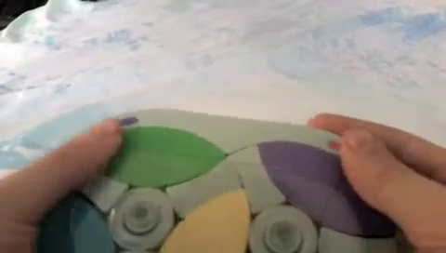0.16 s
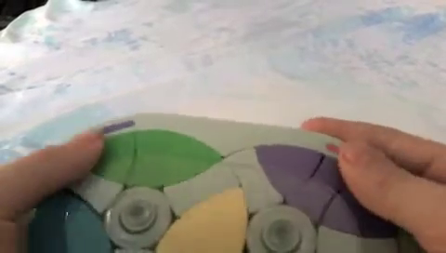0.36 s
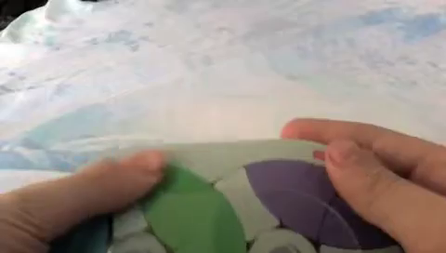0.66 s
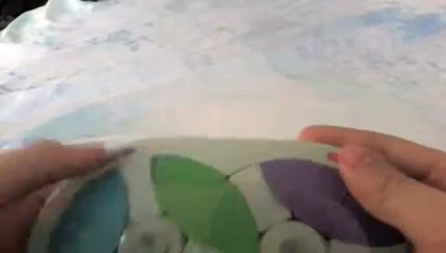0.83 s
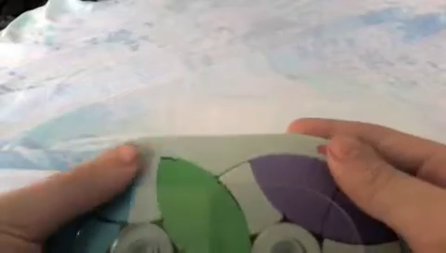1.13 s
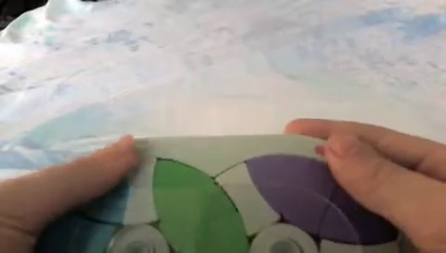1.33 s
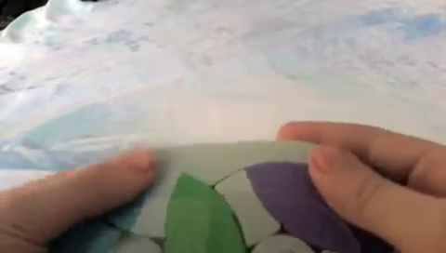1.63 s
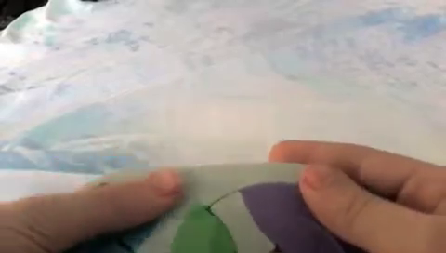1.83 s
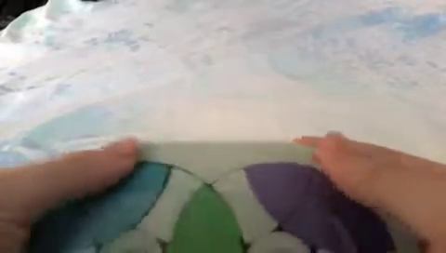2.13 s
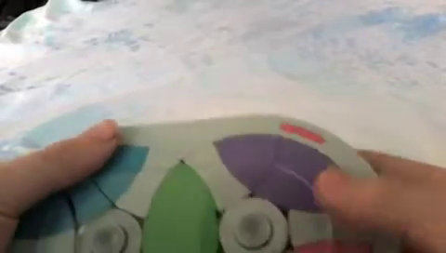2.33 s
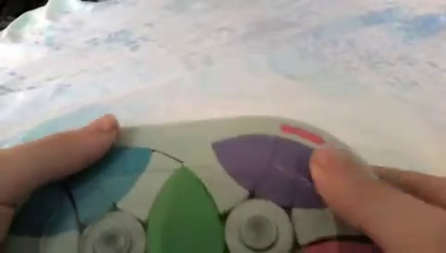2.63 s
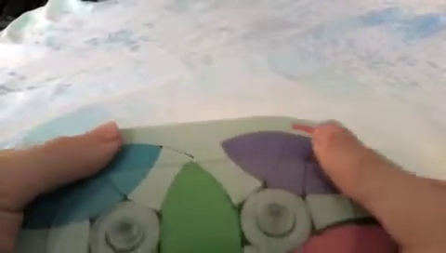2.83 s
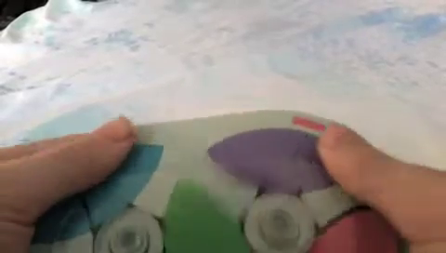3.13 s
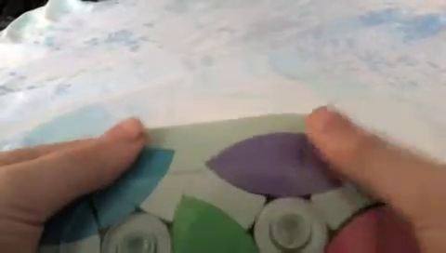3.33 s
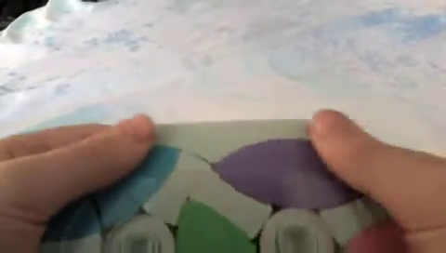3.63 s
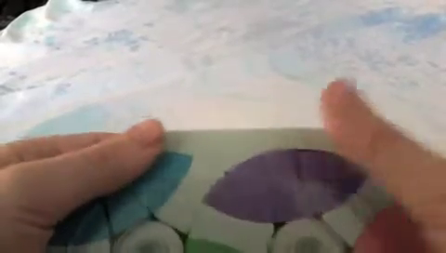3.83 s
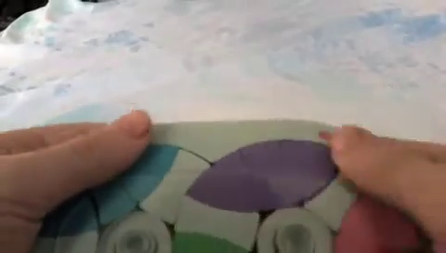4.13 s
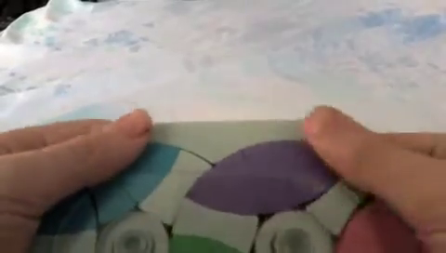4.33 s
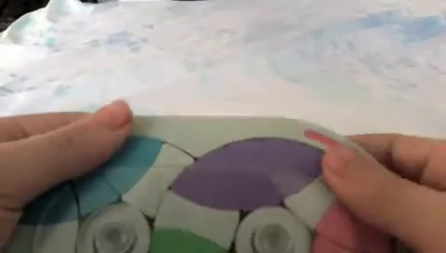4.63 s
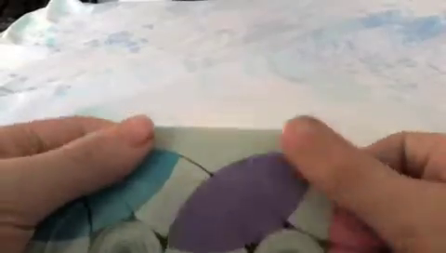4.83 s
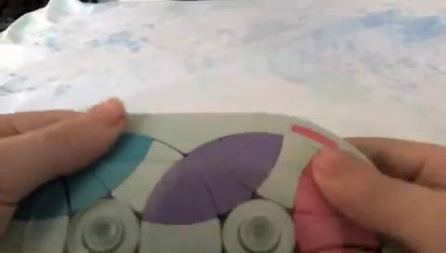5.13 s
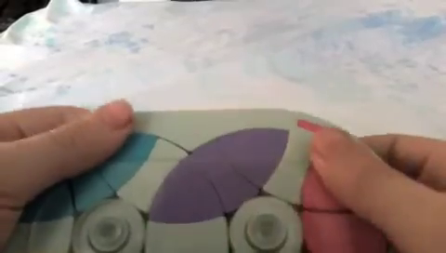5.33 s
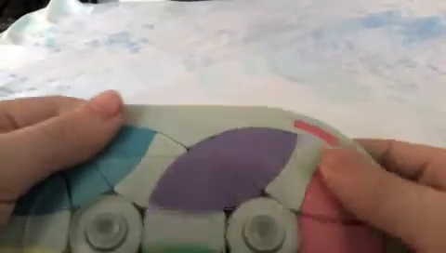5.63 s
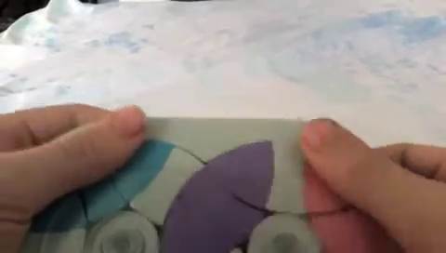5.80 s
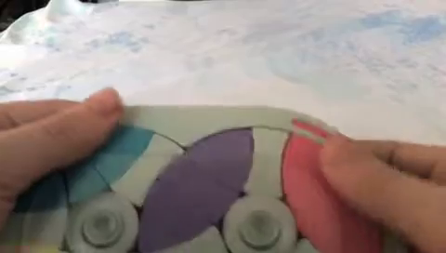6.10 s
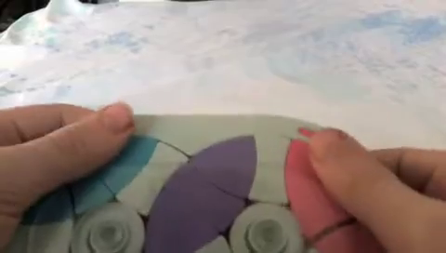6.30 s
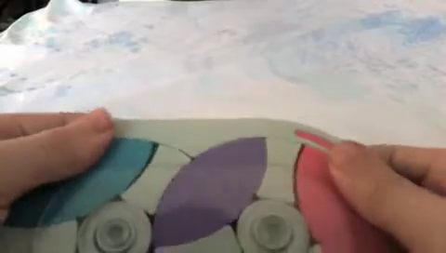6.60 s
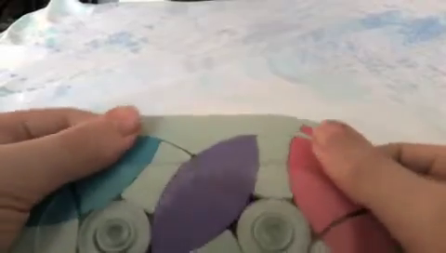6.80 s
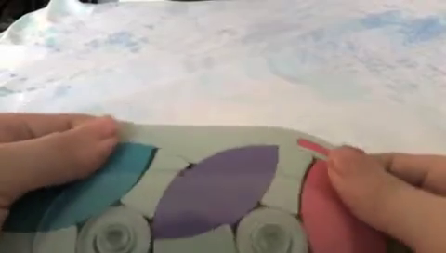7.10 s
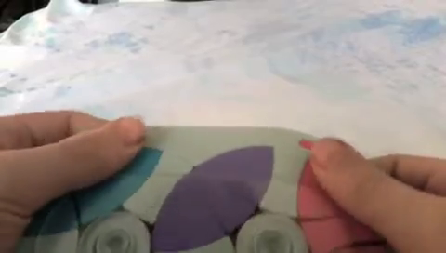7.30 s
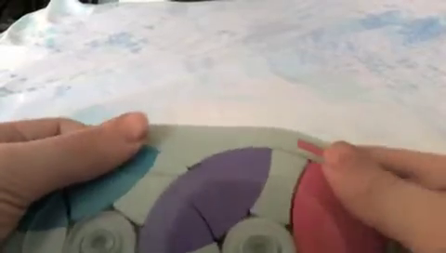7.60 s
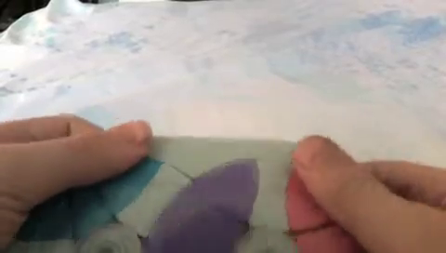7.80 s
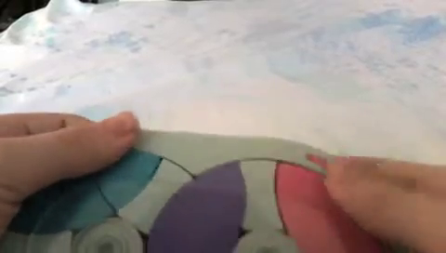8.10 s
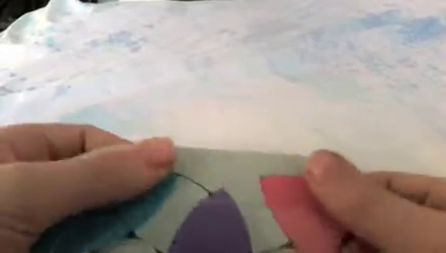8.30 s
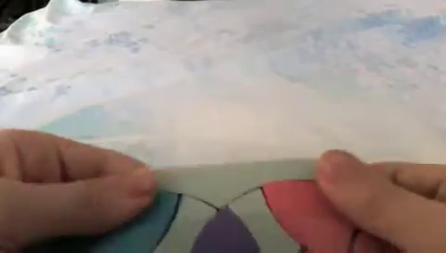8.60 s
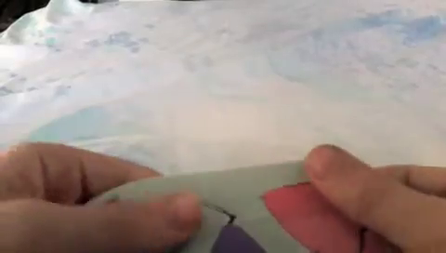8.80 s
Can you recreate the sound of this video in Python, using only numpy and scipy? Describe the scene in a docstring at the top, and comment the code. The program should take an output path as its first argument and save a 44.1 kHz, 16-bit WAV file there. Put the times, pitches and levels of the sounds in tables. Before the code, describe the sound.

Close, dry plastic rattling indoors: a few scattered clicks and scrapes first, then denser clacking with several loud snaps as pieces shift and seat. Tiny piercing squeaks slip in before two seconds and around six and a half to seven. Muffled bumps of the table are barely noticeable. The small microphone gives little bass, and a soft steady room hush remains throughout.

```python
"""A hollow plastic puzzle is turned in two hands close to a small microphone in a quiet, furnished room.
Its pieces click (chatter bursts ringing the shell's modes), scrape along their tracks (gritty noise through
the same modes) and now and then squeak (short near-sines). The table is bumped softly (damped low swings with
puffs of noise). A faint echo of decaying noise follows the puzzle, over steady shaped background noise."""
import sys
import numpy as np
from scipy import signal
from scipy.fft import rfft, irfft, next_fast_len
from scipy.io import wavfile
from scipy.ndimage import uniform_filter1d, map_coordinates

SR = 44100
rng = np.random.default_rng(int(sys.argv[2]) if len(sys.argv) > 2 else 0)


def dump_mix(stems):
    """Bounce the given channels to the path in sys.argv[1] as a 16-bit WAV at rate SR."""
    frames = np.atleast_2d(stems).T  # one column per channel
    limited = np.clip(frames, -1, 1)  # hard clip at full scale
    pcm = np.round(limited * 32767).astype(np.int16)
    wavfile.write(sys.argv[1], SR, pcm)


def gain_from_decibels(decibels):
    """Convert decibel values to linear amplitude factors."""
    exponent = np.asarray(decibels, float) / 20
    return 10 ** exponent


N = 394681

# background noise spectrum, before its overall level is set: pitch_hz, level_db (per Hz, relative)
FLOOR_SPECTRUM = [(40, -32), (85, -7.5), (200, -4.5), (500, -14), (900, -6.5), (2000, -15.5), (7000, -31),
                  (11000, -35.5), (14000, -62)]
# soft table bumps: start_s, level_db, pitch_hz, swing_t60_s
TABLE_BUMPS = [(0.051, -28.5, 152.6, .074), (1.695, -35.5, 161, .074), (3.631, -37.5, 131, .074),
               (3.743, -37, 158, .074), (3.943, -39, 150, .074), (3.965, -46.5, 140, .074),
               (4.625, -46, 383, .074), (4.665, -43, 144.7, .08), (5.007, -50, 159, .074),
               (5.497, -38.5, 142, .074), (8.026, -33.5, 468, .16)]
# contacts between pieces: start_s (the first touch), level_db (peak of the middle modes, before the bass loss),
# body_db and treble_db (peaks relative to the middle), chatter_ms (optional, where pieces drag)
PIECE_CLICKS = [(0.0948, -40.5, -11, -74), (0.174, -40, -13, -61), (0.2754, -10, -22, -12.5),
                (0.289, -20, -3, -13.5), (0.4197, -29.5, -17, -24), (0.4364, -24.5, -28, -14),
                (0.4424, -19.5, -39, -16), (0.4554, -21.5, -23, -15), (0.461, -16, -17.5, -10),
                (0.4755, -23, -5.5, -1), (0.5709, -29.5, 1, -28.5), (0.637, -23, -1, -25.5),
                (0.791, -35.5, -5, -18), (0.8588, -36, -16, -88), (0.9381, -52.5, -1, 11),
                (0.97, -30.5, -5.5, -6), (0.9821, -17.5, -17.5, 4), (1.0126, -23, -2.5, -29),
                (1.0924, -18.5, -6, -43.5), (1.1, -22, -9, -23.5), (1.1053, -24, -12, -28.5),
                (1.144, -38.5, -9, -27), (1.4288, -22.5, -8, -11.5), (1.4421, -17.5, -17, -25),
                (1.4494, -17, -10, -21), (1.4605, -19.5, -15, -5), (1.5082, -21, -18.5, -40),
                (1.5688, -20.5, -27, -8), (1.5747, -19, -15, -7.5), (1.5817, -13.5, -13, -4.5),
                (1.5956, -13, -10.5, 2.5), (1.8076, -43.5, -2.5, -19.5), (1.9061, -35, -2, -22.5),
                (1.9527, -32.5, -8.5, -37.5), (2.0035, -31.5, -4, -28), (2.0227, -24.5, -14.5, -15.5),
                (2.0298, -20, -21, -2.5), (2.1724, -15.5, -16.5, -15.5, 4), (2.1884, -23, -4, -18),
                (2.2152, -19, -10.5, -10), (2.234, -18.5, -14, -7, 7), (2.2958, -22.5, -11.5, -13.5),
                (2.4418, -25.5, -8, -37), (2.4982, -36.5, -11, -31), (2.5792, -23, -10, -17.5),
                (2.613, -19, -19, -21), (2.6285, -24, -7, -35), (2.6686, -25, -13, -27),
                (2.7131, -7, -5.5, -10, 10), (2.8086, -27, -6, -53), (2.9039, -11, -10.5, -14.5),
                (2.9436, -15, -19.5, 1, 7), (3.0984, -31.5, -7, -6), (3.1053, -12, -10, -7),
                (3.1183, -21, -22, -37), (3.123, -20, -23, -28.5), (3.192, -23, -10, -5, 5),
                (3.2, -18.5, -9.5, -15, 9), (3.2208, -28, 2, -23.5), (3.2908, -34.5, -25, -40),
                (3.3933, -27.5, -7.5, -30), (3.3996, -20.5, -22, -32), (3.468, -22.5, -9, -14.5),
                (3.5939, -20, -10, -12), (3.6254, -17, -8, -5), (3.7157, -8.5, -5, 1),
                (3.84, -25.5, -33, -51.5), (3.8492, -24.5, -8.5, -33.5), (3.8615, -22, -24, -61),
                (3.8667, -23, -8, -12.5), (4.009, -31.5, -9.5, -26.5), (4.0168, -12.5, -12, -8.5, 6),
                (4.095, -19.5, -11, -27), (4.1019, -24, -3.5, -2), (4.129, -22, -0.5, 0.5),
                (4.147, -28.5, -5, -10.5), (4.1622, -18, 3, -6.5), (4.2516, -18.5, -12.5, -27),
                (4.2886, -27.5, -12, -5), (4.4225, -31, -26, -17.5), (4.445, -11, -14.5, -5.5, 10),
                (4.4715, -22, -13, -31.5), (4.5209, -29, -10, -20), (4.6637, -14, -7, -5.5),
                (4.6768, -25, -15, -19.5), (4.6865, -26, -10, -2), (4.696, -30, -8, -30),
                (4.712, -26, 4, -9), (4.7995, -28.5, 13, -10, 8), (4.812, -28, -10, 3),
                (4.9554, -19, -18.5, -11.5), (4.9693, -17.5, -18, 1.5), (5.034, -40, -11, -43.5),
                (5.1726, -14, -14, -6.5), (5.2294, -48.5, 6, -23), (5.2453, -45, 8.5, -27),
                (5.3576, -18.5, -13.5, -4.5), (5.3832, -35.5, -17, -9), (5.4745, -20, -27, -16),
                (5.486, -17, -6, 0, 7), (5.673, -17, -9.5, 2.5), (5.681, -19.5, -11, -23),
                (5.7505, -18, -2, -14.5, 5), (5.7688, -12, -7, 1), (5.794, -21, -10, -8),
                (5.803, -15, -11, -5, 10), (5.975, -38, -15, -40, 4), (5.9914, -9, -12.5, -3.5),
                (6.2367, -22, -5.5, -15.5), (6.2643, -22, -1.5, -7), (6.4923, -14.5, -28, -20),
                (6.502, -19.5, -25.5, -18), (6.5923, -26, -6.5, -30.5), (6.6943, -34, -14.5, -50),
                (6.7207, -18, -8, -28), (6.7321, -33.5, -0.5, -15.5), (6.791, -26.5, -4.5, -13),
                (6.8231, -20, -0.5, -45.5), (7.0355, -15.5, -13.5, -4, 7), (7.0523, -20.5, -16, -15.5),
                (7.232, -40, -11.5, -40), (7.2477, -15, -21.5, -5), (7.2603, -23, -6.5, -16),
                (7.2898, -23.5, -9, 1), (7.3127, -23, -6.5, -0.5), (7.3937, -42, -26, -16),
                (7.451, -25, -6, -21), (7.513, -39, -11, -36.5), (7.5298, -16.5, -25, -21.5, 6),
                (7.537, -16, -12.5, -10), (7.5632, -25.5, -34, -34), (7.7197, -24, -12, -11),
                (7.7274, -18, -4.5, -5.5), (7.7712, -19, -2.5, -16.5, 5), (7.8115, -14.5, -7.5, -5),
                (7.8292, -16, -5, -10, 5), (7.845, -27, -8, -30), (7.8662, -7, -6, -12, 8),
                (7.915, -34, -10, -40), (8.0047, -41, -17.5, -37), (8.0213, -11.5, -9.5, -18, 8),
                (8.0395, -19, -15, -8, 5), (8.056, -19, -12, -15, 4), (8.066, -25, -15, -10),
                (8.077, -27, -10, -12), (8.1694, -35.5, -14, -48.5), (8.2034, -26, -17, 3.5),
                (8.2152, -11, -9, -3, 8), (8.2387, -18, -8, -21), (8.269, -25.5, -12, -5),
                (8.2791, -24.5, -1, -6), (8.4612, -42, -14.5, -34.5), (8.5084, -24, -5, -45),
                (8.5279, -31.5, 2.5, -14.5), (8.6362, -30, -2.5, -25), (8.7124, -16.5, -7.5, -1.5),
                (8.7212, -28, -14, -23.5), (8.7481, -18.5, -2, -37.5), (8.7817, -23, -6.5, -22),
                (8.8695, -32, 1.5, -34)]
# shell and piece resonances, grouped as body, middle and treble:
# pitch_hz (before detuning), width_hz (before damping), level_db (before scatter)
SHELL_MODES = [
    [(528, 290, -13.5), (985, 230, -1), (1385, 311, -1)],
    [(2477, 856, 1), (3840, 2660, 3), (4762, 900, 1.5), (6580, 810, -11)],
    [(8740, 1100, 6.5), (10770, 1900, 3), (12400, 2700, -3.5), (14300, 6500, -10)],
]
# decay of the room's echo: pitch_hz, t60_s
ROOM_DECAY = [(600, 0.17), (4000, .19), (10000, 0.18), (15000, 0.15)]
# sliding strokes: start_s, end_s, level_db (mid-stroke, before grit and bass loss),
# gain_db (rise from start to end), treble_db (relative to the middle)
TRACK_SLIDES = [(0.437, 0.57, -42.5, 7, -5.5), (0.578, 0.757, -44.5, 4.5, -4),
                (0.957, 1.108, -53.5, 32.5, 2.5), (1.561, 1.702, -47, 0.5, 7),
                (1.834, 1.961, -48.5, -19.5, 2), (2.181, 2.248, -51, 10, -12.5),
                (2.353, 2.406, -64.5, -13, 13.5), (2.447, 2.525, -63, -14, 5),
                (2.577, 2.64, -56, -11, -5.5), (2.714, 2.756, -45.5, -16.5, -7),
                (2.919, 2.959, -39, 0.5, -10), (3.095, 3.225, -40.5, 4, -5),
                (3.726, 3.791, -40, -22.5, -13), (4.083, 4.185, -53, 30.5, -37),
                (4.434, 4.488, -41.5, -10.5, -30.5), (4.655, 4.813, -44, 15.5, -5),
                (4.853, 4.891, -55.5, -2, -23), (4.945, 4.976, -47.5, 14.5, -30),
                (5.474, 5.599, -49, -18.5, 1), (5.687, 5.737, -44.5, 5, 1.5), (5.717, 5.813, -42.5, 41, -4),
                (5.9, 5.94, -59, 0, -15), (6.226, 6.3, -52, -20.5, -2), (6.49, 6.601, -46, -19, 1.5),
                (6.717, 6.847, -53, -33.5, -2.5), (7.029, 7.159, -43.5, -5.5, -5.5),
                (7.24, 7.358, -47, 0, -6), (7.438, 7.456, -55, 3, 0), (7.523, 7.594, -52, -18, -11),
                (7.747, 7.895, -47.5, 14.5, -5.5), (8.022, 8.083, -43, -28, -4.5),
                (8.228, 8.345, -38, -9.5, -10.5), (8.457, 8.539, -52.5, 3.5, -4), (8.62, 8.65, -59, 0, 3),
                (8.739, 8.793, -39, -3, -8)]
# stick-slip squeaks: centre_s, level_db (peak, before the bass loss), pitch_hz (at the centre),
# length_ms (between the half-amplitude points)
EDGE_SQUEAKS = [(1.608, -7.5, 12670.0, 5.2), (1.62, -21.5, 8600, 6.9), (1.6695, -8.5, 9020, 6.6),
                (1.6796, -10.5, 8930, 5.7), (1.6858, -13, 8910, 7.8), (1.8594, -13, 9030, 12),
                (6.5445, -4, 9680, 5.7), (6.7861, -1, 9830, 8), (7.085, -10.5, 9740, 6.4),
                (7.3137, -5.5, 9860, 5.3), (7.3393, -4, 10070, 6.3)]


def unit(x):
    """Scale to rms 1 along the last axis."""
    return x / np.sqrt(np.mean(x ** 2, axis=-1, keepdims=True) + 1e-20)


def along(points, hz):
    """Read a curve of (Hz, value) points on a log frequency axis."""
    point_hz, value = np.transpose(points)
    return np.interp(np.log(hz + 1), np.log(point_hz + 1), value)


def wobble(rate):
    """A smooth random curve with rate knots a second."""
    knots = rng.standard_normal(int(N * rate / SR) + 4)
    return map_coordinates(knots, [np.arange(N) * rate / SR])


def filtered(x, response):
    """Filter x by a complex response of frequency."""
    size = next_fast_len(x.shape[-1] + 2048)
    spectrum = rfft(x, size) * response(np.fft.rfftfreq(size, 1 / SR))
    return irfft(spectrum, size)[..., :x.shape[-1]]


def skirt(f, hz):
    """Causal two-pole fall below hz, 6 dB down at hz / 2."""
    return (1j * f / (1j * f + hz / 2)) ** 2


def ringing(modes, scatter_db, detune, damping=1):
    """Causal response of a group of damped modes, each at a new strength and slightly new pitch."""
    hz, width, db = np.transpose(modes)[:, :, None]
    hz = hz * (1 + detune * rng.standard_normal(hz.shape))
    width = width * damping
    alternating = (-1) ** np.arange(len(hz))[:, None]
    gain = gain_from_decibels(db + scatter_db * rng.standard_normal(db.shape)) * alternating
    return lambda f: np.sum(gain * 1j * f * width / (hz * hz - f * f + 1j * f * width), axis=0)


def add(track, s, sound):
    """Mix a sound into the track at s seconds."""
    part = track[max(round(s * SR), 0):][:len(sound)]
    part += sound[:len(part)]


def floor():
    """Room and microphone noise: shaped random noise whose level drifts slightly."""
    noise = filtered(rng.standard_normal(N), lambda hz: gain_from_decibels(along(FLOOR_SPECTRUM, hz)))
    level_db = -66 + 0.4 * wobble(1.7)
    return gain_from_decibels(level_db) * unit(noise)


def bumps():
    """Dull low knocks: each is a damped swing and a puff of low noise."""
    out, t = np.zeros(N), np.arange(SR // 5) / SR
    for s, db, hz, t60 in TABLE_BUMPS:
        low_band = lambda f: skirt(f, hz) / (1 + 1j * f / (3.6 * hz)) ** 4
        puff = unit(filtered(rng.standard_normal(len(t)), low_band))
        swing = gain_from_decibels(-60 * t / t60) * np.sin(2 * np.pi * hz * t)
        knock = swing + 0.62 * gain_from_decibels(-60 * t / .074) * puff
        onset = 1 - np.exp(-t * hz / 1.2)
        add(out, s, gain_from_decibels(db) * onset * knock)
    return out


def clicks():
    """Each contact is a few milliseconds of chatter that rings the shell."""
    # usual chatter at -20 dB; louder contacts last longer, and each differs by chance
    contact_ms, longer_db_per_db, uneven_db = 2.2, 0.08, 2.2
    out, t = np.zeros(N), np.arange(-512, 1536) / SR
    after, before = np.maximum(t, 0), np.maximum(-t, 0)
    for s, db, body_db, treble_db, *drag_ms in PIECE_CLICKS:
        length_db = longer_db_per_db * (db + 20) + uneven_db * rng.standard_normal()
        usual_ms = contact_ms * gain_from_decibels(length_db)
        span_s = (drag_ms[0] if drag_ms else usual_ms) / 1000
        hard = gain_from_decibels(min(treble_db + 12, 0) / 3)  # 1 for a hard contact, towards 0 for a soft one
        push = np.exp(-before * (hard + .2) / .00055 - (after / span_s) ** 1.45)
        # the piece creeps in and settles
        creep = (gain_from_decibels(-26) + gain_from_decibels(-21) * (t > 0)) * np.exp(-before / .004 - after / .009)
        push = push + creep
        for modes, over_db in zip(SHELL_MODES, (body_db, 0, treble_db)):
            chatter = push * rng.standard_normal(len(t))
            chatter[t == 0] = 3 * hard  # the first touch is a sharp snap
            shell = ringing(modes, scatter_db=3.5, detune=0.045, damping=.45 + .7 * hard)
            edge_hz = modes[-1][0] * 2.5 * (.1 + .9 * hard)  # a soft contact drives the upper modes less
            response = lambda f: shell(f) * skirt(f, modes[0][0]) / (1 + 1j * f / edge_hz) ** 4
            ring = filtered(chatter, response)
            add(out, s + t[0], gain_from_decibels(db + over_db) * ring / np.abs(ring).max())
    return out


def room(x):
    """Reverberation that dies by frequency; the hands move, so every 50 ms meets a new tail."""
    out, step = np.zeros(N + SR), SR // 20
    for i in range(0, N, step):
        hz, t, z = signal.stft(rng.standard_normal(SR // 3), SR, nperseg=128)
        decay = gain_from_decibels(-60 * t / along(ROOM_DECAY, hz)[:, None])
        tail = signal.istft(z * decay, SR, nperseg=128)[1]
        echo = signal.fftconvolve(x[i:i + step], tail / np.linalg.norm(tail))
        add(out, i / SR + 0.0079, echo)
    return out[:N]


def slides():
    """Rough plastic on plastic: gritty noise through the same shell, held a little differently each stroke."""
    slips_per_s, slip_db = 280, 10  # sudden slips, and the largest before each mode group's share
    out = np.zeros(N)
    catches = (rng.random(N) < slips_per_s / SR) * slip_db * rng.random(N)
    slips = signal.lfilter([1], [1, -np.exp(-1 / (.0018 * SR))], catches).clip(max=slip_db)
    shared_db = np.outer([.9, 1, .55], 1.6 * wobble(45) + slips)  # body, middle, treble
    grit_db = shared_db + [2 * wobble(300), 2 * wobble(400), wobble(400)]
    grit_db = grit_db + 2.5 * np.array([wobble(25), wobble(25), wobble(25)])  # the colour shifts
    noise = rng.standard_normal((3, N))
    rub = unit(gain_from_decibels(grit_db) * noise)
    for start, end, scrape_db, gained_db, treble_db in TRACK_SLIDES:
        span = slice(round(start * SR) - 512, round(end * SR) + 1024)
        part = (np.arange(N)[span] / SR - start) / (end - start)  # 0 to 1 through the stroke
        level = gain_from_decibels(scrape_db + gained_db * (part - .5)) * (part > 0) * (part < 1)
        # soften both ends over about 18 ms
        level = uniform_filter1d(uniform_filter1d(level, size=400), size=400)
        bands = zip(SHELL_MODES, (1.5, 0, treble_db), rub[:, span], noise[:, span])
        for modes, over_db, gritty, even in bands:
            shell = ringing(modes, scatter_db=2.5, detune=.05)

            def response(f):
                """Shell modes within a band, with a treble lift."""
                band = skirt(f, modes[0][0]) / (1 + 1j * f / (2 * modes[-1][0])) ** 2
                return shell(f) * band * (1 + 1j * f / 9000) ** 1.4

            scrape = filtered(level * gritty, response) / filtered(even, response).std()
            add(out, span.start / SR, gain_from_decibels(over_db) * scrape)
    return out


def squeaks():
    """A piece edge sings while it grips: a swelling near-sine."""
    out, t = np.zeros(N), np.arange(-1024, 1024) / SR
    for s, db, hz, ms in EDGE_SQUEAKS:
        phase = 2 * np.pi * hz * (t + .4 * t * t)  # the pitch rises slightly
        jitter = uniform_filter1d(.04 * rng.standard_normal(len(t)), size=24)
        phase = phase + np.cumsum(jitter)  # the grip is unsteady
        swell = np.exp(-np.log(2) * np.abs(2000 * t / ms) ** 3)
        add(out, s + t[0], gain_from_decibels(db) * swell * np.sin(phase))
    return out


def scene():
    """The puzzle, its echo, the bumps and the background; so small a shell radiates no bass."""
    puzzle = filtered(clicks() + slides() + squeaks(), lambda f: skirt(f, hz=510))
    echo = gain_from_decibels(-19.5) * room(puzzle)
    return (puzzle + echo + bumps() + floor())[None]


def top_cut(x):
    """Nothing passes above the cut-off."""
    return signal.sosfilt(signal.butter(12, 16460, fs=SR, output="sos"), x)


def record(dry):
    """The microphone input rounds off the loudest peaks, and its response fades towards both band ends."""
    rounded = dry / (1 + np.abs(dry / .93) ** 7) ** (1 / 7)
    colour = lambda hz: skirt(hz, hz=150) / (1 + (hz / 15350) ** 40)
    return top_cut(filtered(rounded, colour))


dry = scene()
out = record(dry)
dump_mix(out)
```